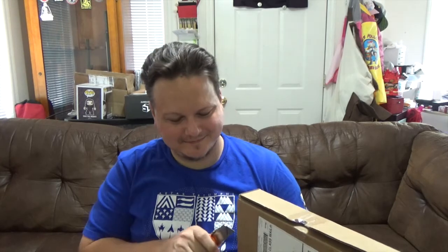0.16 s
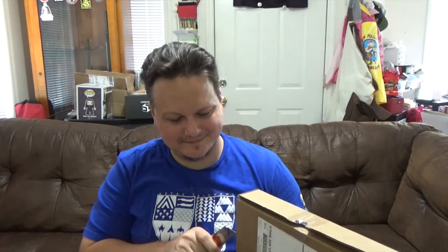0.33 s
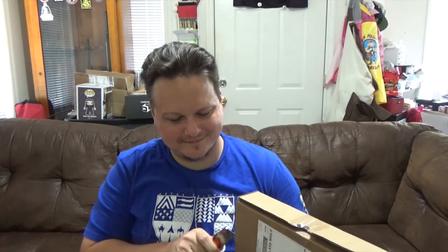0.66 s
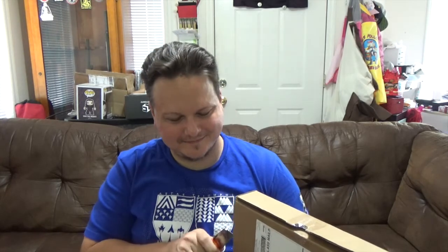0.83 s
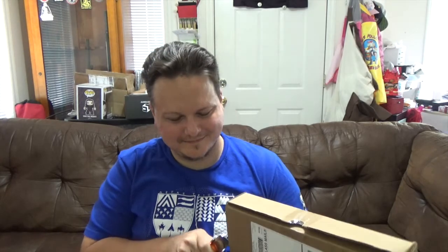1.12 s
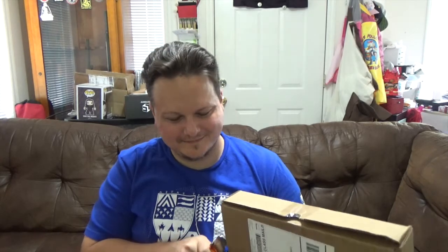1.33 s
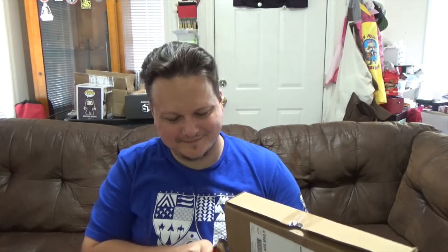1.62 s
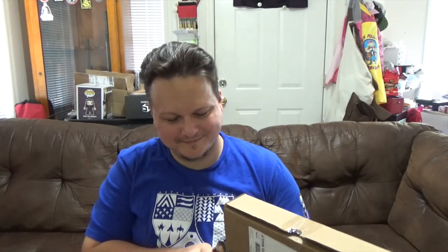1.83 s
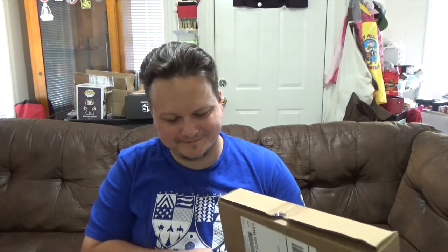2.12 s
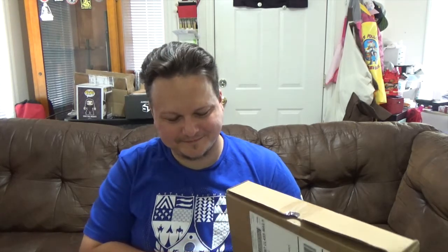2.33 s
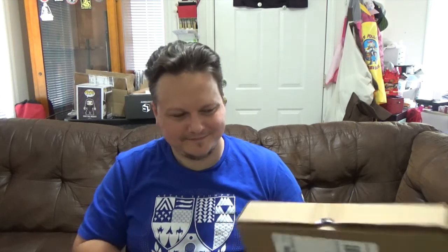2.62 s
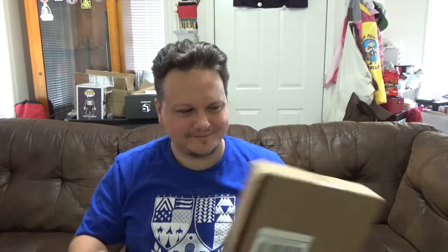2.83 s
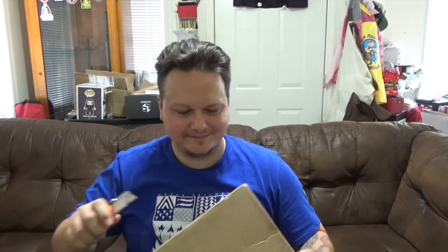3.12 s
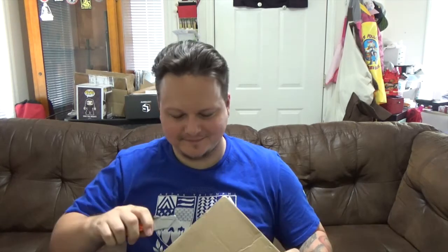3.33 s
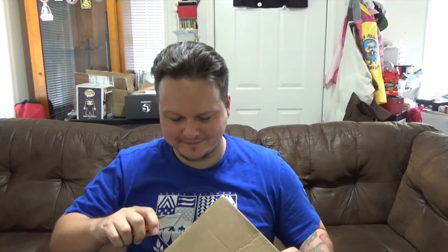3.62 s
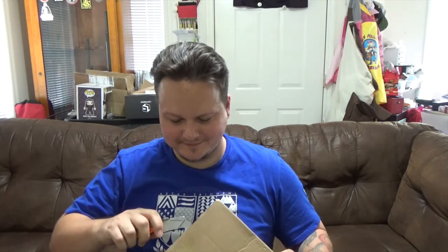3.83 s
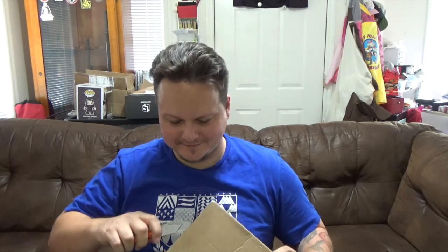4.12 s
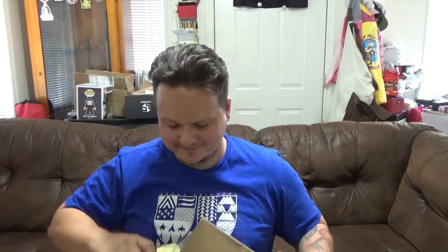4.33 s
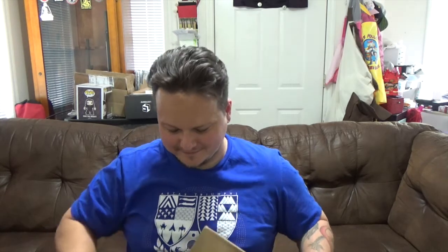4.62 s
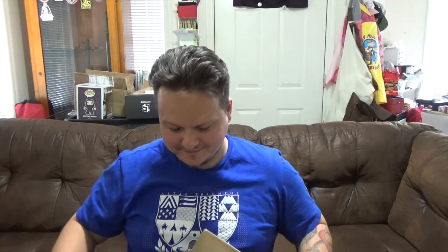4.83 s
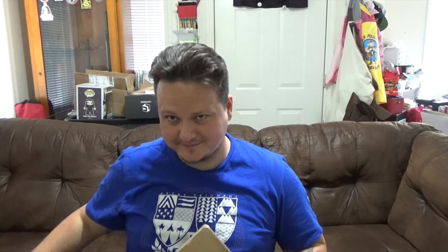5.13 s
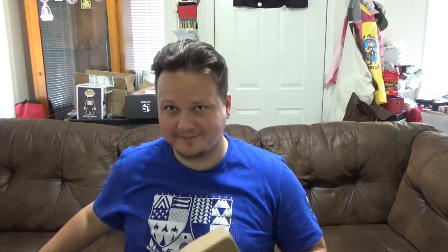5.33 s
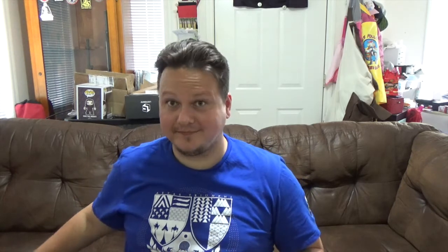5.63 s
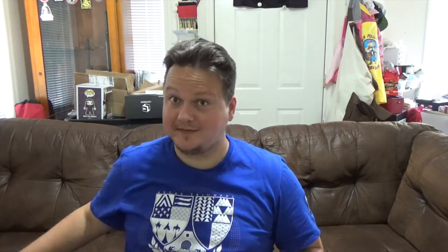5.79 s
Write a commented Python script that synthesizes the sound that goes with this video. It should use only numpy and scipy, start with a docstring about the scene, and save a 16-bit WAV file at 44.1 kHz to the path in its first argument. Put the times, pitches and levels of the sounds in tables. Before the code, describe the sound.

A quiet furnished room, heard through a nearby camera microphone, with soft low motor hum, airy noise and a very faint, rapidly pulsing high whine. For the first half second there is only this background. From 0.6 to 1.8 s come tiny ticks and soft scuffs on card, with a barely audible wavering squeak near 1.1 s. At 1.93 s a sharp crack bursts through tape, and at 2.2 s a louder one with a hollow knock and short bright, gritty rip, fading by 2.4 s. From 2.5 to 3.1 s fingers tap and slide as the box turns, changing its tone. A sparse pause follows, with a tick at 3.5 s. Small scrapes and snaps begin around 4.0 s, leading to a strong, boxy thump at 4.57 s and a juddering rasp until about 4.8 s. Then near quiet, with light rustles and ticks at 5.6 to 5.8 s, the whine slightly lower.

```python
"""Opening a taped cardboard box

A small blade opens the tape seals of a flat cardboard box in a furnished living room, close to a camera
microphone. The point pops through the tape (sharp cracks), the edge rasps along the seam (bursts of tiny random
fractures), and the hollow box thumps as the slit lets go (decaying tones). Between cuts, fingers tap and slide
on the card. The box is turned once, which changes its tone. The room hums (filtered noise, low tones), and a
faint electronic whine chirps thirty times a second."""
import sys
import numpy as np
from scipy import signal
from scipy.fft import rfft, irfft
from scipy.io import wavfile
from scipy.ndimage import uniform_filter1d

SR = 44100
rng = np.random.default_rng(int(sys.argv[2]) if len(sys.argv) > 2 else 0)


def materialize(psi):
    """Save the field psi as 16-bit PCM at rate SR to the path in sys.argv[1].

    A 1-D psi becomes a single channel; in a 2-D psi each row is a channel.
    """
    bounded = np.clip(np.atleast_2d(psi).T, -1, 1)
    quanta = np.round(bounded * 32767).astype(np.int16)
    wavfile.write(sys.argv[1], SR, quanta)


N = 262777
T = np.arange(N) / SR  # time in seconds
TURN_S = 2.9  # moment at which the box is swung round to its second seal


def undb(db):
    """Decibels to gain."""
    return 10 ** (np.asarray(db) / 20)


def unit(x):
    """Scale to rms 1."""
    return x / np.sqrt(np.mean(x ** 2) + 1e-20)


def energy(x):
    """Scale a response to energy 1."""
    return x / np.sqrt(np.sum(x ** 2) + 1e-20)


def peak(x, db):
    """Scale to a peak level in dB."""
    return x * undb(db) / np.max(np.abs(x))


def butter(x, hz, kind):
    """Second-order low-pass or high-pass filter."""
    return signal.sosfilt(signal.butter(2, hz, kind, fs=SR, output="sos"), x)


def through(x, response):
    """Pass a sound through a response, keeping its length."""
    return signal.fftconvolve(x, response)[:len(x)]


def add(out, s, x):
    """Mix a short sound in at time s."""
    i = int(s * SR)
    out[i:i + len(x)] += x[:N - i]


def gains(points, size):
    """Gain at each FFT bin, drawn between (Hz, dB) points on a log pitch scale."""
    hz, db = np.transpose(points)
    bin_hz = np.arange(size // 2 + 1) * SR / size
    return undb(np.interp(np.log(bin_hz + 1), np.log(hz), db))


def colour(points, size=2048):
    """Short response with the given spectrum that starts at once (minimum phase, by folding the cepstrum)."""
    cepstrum = irfft(np.log(gains(points, size)))
    cepstrum[1:size // 2] *= 2
    cepstrum[size // 2 + 1:] = 0
    return energy(irfft(np.exp(rfft(cepstrum))))


def ring(hz, t60, size=12000):
    """One damped tone that fades by 60 dB in t60 seconds."""
    return np.sin(2 * np.pi * hz * T[:size]) * np.exp(-np.log(1000) * T[:size] / t60)


def walk(rate):
    """Smooth random wander with rms 1, taking about rate steps per second."""
    step = max(int(SR / rate), 1)
    stairs = np.repeat(rng.standard_normal(N // step + 1), step)
    return unit(uniform_filter1d(stairs, step)[:N])


def grains(rate, spread_db):
    """Tiny fractures at random moments, rate per second, of random sign and unequal size."""
    happens = rng.random(N) < rate / SR
    sign = np.sign(rng.standard_normal(N))
    scatter = np.clip(rng.standard_normal(N), -2, 2)
    return unit(happens * sign * undb(spread_db * scatter))


# How much the left and right ports differ for sound from all around.
# Each row: pitch in Hz, side level against the middle in dB.
PORT_DIFFERENCE = [(60, -36.5), (110, -30.5), (200, -15.5), (380, -10), (700, -7.5), (1290, -2),
                   (2380, -3.5), (4400, -5.5), (8120, -11), (15000, -38.5)]


def diffuse(mid, side):
    """Left and right of a sound from all around; the close ports agree in the bass."""
    side = irfft(rfft(side) * gains(PORT_DIFFERENCE, N), N)
    return np.array([mid + side, mid - side])


# Spectrum of the room air. Each row: pitch in Hz, relative level in dB.
AIR_SPECTRUM = [(12, -53.5), (20, -9.5), (53, -11.5), (146, -1), (172, -6.5), (270, -11.5), (377, -8),
                (410, -11.5), (446, -14.5), (825, -11), (1290, -19), (2670, -21.5), (4300, -26),
                (9950, -28.5), (16000, -35)]
AIR_DB = -64  # before the swell below
# Slow changes of air and hum together. Each row: time in seconds, added level in dB.
ROOM_SWELL = [(0, 4), (.5, 0.5), (1.5, 2), (2.6, 4), (3.5, 4), (4.9, 5), (5.96, 5)]
# Household motors. Each row: pitch in Hz, level in dB before the waver and the swell.
MOTOR_HUM = [(81, -82.5), (104, -80), (120, -87.5), (146, -72.5), (665, -83.5)]


def background(hum_waver_db=2.5):
    """Room air is shaped noise; household motors hum as low tones that waver in level and phase."""
    air = []
    for noise in rng.standard_normal((2, N)):
        air.append(undb(AIR_DB) * unit(irfft(rfft(noise) * gains(AIR_SPECTRUM, N), N)))
    hum = np.zeros(N)
    for hz, db in MOTOR_HUM:
        tone = unit(np.sin(2 * np.pi * hz * T + 1.16 * walk(9)))
        hum += undb(db + hum_waver_db * walk(8.4)) * tone
    return (diffuse(*air) + hum) * undb(np.interp(T, *np.transpose(ROOM_SWELL)))


# Lower tone of the electronic whine.
# Each row: time in seconds, pitch in Hz before a small waver, level in dB before it is made uneven.
WHINE_PATH = [(0, 3040, -71.5), (1.2, 3053, -72.5), (1.7, 3107, -70.5), (3.8, 3110, -70), (4.5, 3104, -69),
              (5.0, 2660, -71.5), (5.96, 2670, -70.5)]


def whine(upper_hz=3730, upper_db=-6, waver=0.0062, uneven_db=2.5):
    """Two thin electronic tones chirp together thirty times a second; upper_hz is the upper one's start."""
    s, hz, db = np.transpose(WHINE_PATH)
    wavering_hz = np.interp(T, s, hz) * (1 + waver * walk(90))
    phase = 2 * np.pi * np.cumsum(wavering_hz) / SR
    pulse = np.cos(np.pi * 29.97 * (T + .004)) ** 4
    level = undb(np.interp(T, s, db) + uneven_db * walk(18))
    tones = np.sin(phase) + undb(upper_db) * np.sin(upper_hz / hz[0] * phase)
    return level * pulse * tones


ROOM_T60_S, ROOM_DB, EARLY_DB = 0.26, -16, -16  # bass fading time, tail and early levels


def room(x, early_s=0.011, treble_t60_s=0.27, split_hz=2500, size=20000):
    """Quick reflections from the body and sofa, then the short tail of a soft room, as fading noise."""
    t = T[:size]
    near, far = rng.standard_normal((2, size))
    early = energy(near * np.exp(-t / early_s) * (t > .001))
    low = butter(far, split_hz, "low")
    low_tail = low * np.exp(-np.log(1000) * t / ROOM_T60_S)
    high_tail = (far - low) * np.exp(-np.log(1000) * t / treble_t60_s)
    tail = energy((low_tail + high_tail) * (t > .008))
    return through(x, undb(EARLY_DB) * early + undb(ROOM_DB) * tail)


# A thin, faint squeak. Each row: time in seconds, pitch in Hz, level in dB.
SQUEAK_PATH = [(1.02, 3690, -83), (1.06, 3820, -70), (1.11, 3660, -79), (1.17, 3650, -76),
               (1.21, 3800, -69), (1.25, 3740, -72), (1.29, 3530, -85)]


def whistle():
    """A thin squeak, one gliding tone, wavers twice up and down."""
    s, hz, db = np.transpose(SQUEAK_PATH)
    phase = 2 * np.pi * np.cumsum(np.interp(T, s, hz)) / SR
    return np.sin(phase) * undb(np.interp(T, s, db, left=-np.inf, right=-np.inf))


def patch(hz, t60):
    """A small ringing area; well below its own pitch it radiates little, so the bass is cut."""
    return peak(butter(ring(hz, t60), min(0.64 * hz, SR / 3), "high"), 0)


# Ringing of the box walls and the air inside; turning the box changes which tones the hands reach.
# Each row: pitch in Hz, level in dB before the turn, level in dB after it, time to fade by 60 dB in seconds.
BOX_MODES = [(145.5, -18.5, -12, 0.55), (267, 2.5, 4, 0.093), (291, -8, 0.5, 0.32), (387, -3, -2.5, 0.21),
             (423, -14, -27, 0.061), (471, 0, 8, 0.027), (535, -6, -25, 0.25), (634.5, 10, 5, 0.057),
             (679, 4, -5.5, 0.12), (738, -29.5, -6, 0.053), (816, -4, 3, 0.04), (863, -2, 1, 0.15),
             (950, -12.5, -3, 0.051), (990, 3.5, -13, .05), (1160, -21, -3, 0.057), (1217, 2, 4.5, 0.074),
             (1285, -20, -31, 0.054), (1505, -9, -4, 0.093), (1670, 5, -44, 0.041), (2550, -0.5, -25, .04)]
# Dull flexing of the card. Each row: pitch in Hz, relative level in dB.
CARD_FLEX = [(30, -67), (100, -33), (200, -30.5), (330, -4), (480, 0), (680, 2.5), (850, 0.5), (1100, -4),
             (1700, -7.5), (3000, -41.5), (8000, -40)]


def box_response(flex_db):
    """Ringing panels plus the dead, broad flexing of corrugated card, before and after the turn."""
    hz, before, after, t60 = np.transpose(BOX_MODES)
    modes = np.array([(-1) ** k * ring(hz[k], t60[k]) for k in range(len(hz))])
    responses = []
    for db in (before, after):
        pose = energy(undb(db) @ modes)
        add(pose, 0, undb(flex_db) * colour(CARD_FLEX))
        responses.append(energy(butter(pose, 120, "high")))
    return responses


# Hiss of parting tape. Each row: pitch in Hz, level in dB before the turn, level in dB after it.
TAPE_HISS = [(313, -37, -48), (930, 1, 1.5), (1597, 0.5, 2.5), (2380, 0.5, 6), (3200, -2, -1.5),
             (4200, -2, 3.5), (5640, -2.5, 0.5), (7200, -4.5, 2.5), (8240, 4, 5.5), (10300, 0.5, 5),
             (12200, -5.5, -1), (14700, -13, -7), (16020, -16.5, -19)]


def rasp_response():
    """Colour of the tape's hiss before and after the turn."""
    hz, before, after = np.transpose(TAPE_HISS)
    return [colour(np.transpose([hz, db])) for db in (before, after)]


def excite(force, responses):
    """Drive the box in whichever way it is held at each moment."""
    before = through(force * (T < TURN_S), responses[0])
    after = through(force * (T >= TURN_S), responses[1])
    return before + after


def gestures(rows, sag, release, axis):
    """Gain of hand movements: each swells, eases (sag, dB per second) and dies away; axis picks the level."""
    gain = np.zeros(N)
    for row in rows:
        s, hold, attack = row[:3]
        since = T - s
        rise = 20 * np.minimum(since, 0) / attack
        ease = sag * np.clip(since, 0, hold)
        fall = 20 * np.maximum(since - hold, 0) / release
        gain = np.maximum(gain, undb(row[axis] + np.maximum(rise - ease - fall, -200)))
    return gain


# Light touches of fingers, tape and blade on the card.
# Each row: start in seconds, crack peak in dB, box peak in dB before box_db is added, click peak in dB.
CARD_TICKS = [(.6135, -44.5, -58, -59), (0.805, -45, -57, -50.5), (0.8657, -49, -55, -58),
              (1.018, -43, -48, -46), (1.4176, -32.5, -44, -53), (1.604, -43, -60, -52),
              (1.663, -44, -72, -51.5), (1.7828, -37, -53, -47), (2.1025, -37, -43, -44),
              (2.462, -37, -60, -39), (2.674, -42, -58, -46), (2.713, -40, -46, -39.5),
              (2.748, -31.5, -56, -44), (2.7681, -30.5, -48, -38), (2.799, -48, -48, -62),
              (2.876, -32, -47.5, -41.5), (2.9444, -47, -51, -45), (3.037, -38, -59, -41.5),
              (3.0872, -37, -43, -42), (3.236, -44, -64, -49.5), (3.4694, -32, -44, -37),
              (4.1178, -37.5, -57, -53), (4.1373, -42, -65, -54), (4.1696, -24.5, -49, -49),
              (4.2417, -43, -45.5, -62), (4.375, -40, -56, -55), (4.4742, -24, -38, -35),
              (4.693, -23.5, -31, -37), (5.5721, -35.5, -53, -38), (5.5955, -37, -53, -62),
              (5.7726, -40, -50, -45)]
# Crack of a light contact. Each row: pitch in Hz, relative level in dB.
CONTACT_CRACK = [(100, -47), (800, -17.5), (2000, -0.5), (4000, 0), (6800, -3), (9500, 2.5), (12000, -10.5),
                 (16000, -11.5)]
CRUMBLE_S = 0.0032  # time in which the trail of crushed fibres fades (to 37 percent)


def ticks(box_db=2, crumble=0.19, click_hz=1700, click_t60=0.0015, size=12000):
    """A contact and a quick trail of crushed fibres: a crack on top, a click and a knock below."""
    out, crack, boxes = np.zeros(N), colour(CONTACT_CRACK), box_response(flex_db=18)
    click = patch(click_hz, click_t60)
    for s, top_db, low_db, mid_db in CARD_TICKS:
        force = crumble * rng.standard_normal(size) * np.exp(-T[:size] / CRUMBLE_S)
        force[0] = 1
        box = boxes[int(s > TURN_S)]
        add(out, s, peak(through(force, crack), top_db))
        add(out, s, peak(through(force, box), low_db + box_db))
        add(out, s, peak(through(force, click), mid_db))
    return out


# Hands sliding on the card. Each row: start of the hold in seconds, hold in seconds, attack in seconds
# (rise of 20 dB, before the start), hiss level in dB, drive into the box in dB before body_db is added.
HAND_SLIDES = [(.865, .006, .06, -63, -59), (.958, .01, 0.04, -68, -57), (1.02, .006, .03, -70, -58),
               (1.413, 0.0036, 0.013, -53.5, -49.5), (1.55, .005, 0.046, -68, -68),
               (2.48, 0.057, .03, -66, -64), (2.622, .003, .01, -54, -59), (2.69, 0.089, 0.068, -59, -55),
               (2.825, 0.13, .04, -60.5, -55.5), (3.04, .055, .02, -63, -49), (3.11, .015, .03, -63, -55),
               (3.86, .03, .07, -67, -64), (4.043, .004, .035, -54.5, -49.5), (4.125, 0.014, .02, -59, -57),
               (4.247, .02, .015, -68, -54), (4.328, 0.0074, 0.092, -59, -52.5),
               (5.56, .17, 0.094, -69.5, -63), (5.785, 0.08, 0.13, -62, -57)]
SLIDE_SAG_DB_PER_S, SLIDE_RELEASE_S = 7, 0.03  # release is the time to fall 20 dB


def sliding(body_db=-1, grip_db=3.0):
    """Skin drags unevenly over the paper face: random grains hiss and drive the walls."""
    drag = unit(grains(rate=7000, spread_db=4.0) * undb(grip_db * walk(76)))
    rubbing = gestures(HAND_SLIDES, SLIDE_SAG_DB_PER_S, SLIDE_RELEASE_S, axis=3)
    pressing = gestures(HAND_SLIDES, SLIDE_SAG_DB_PER_S, SLIDE_RELEASE_S, axis=4)
    hiss = excite(drag * rubbing, rasp_response())
    return hiss + undb(body_db) * excite(drag * pressing, box_response(flex_db=11.5))


def crinkles(per_s=30, spread_db=3, crinkle_db=-12):
    """Faint stray cracks of the paper face, following the strength of the sliding hand."""
    rubbing = gestures(HAND_SLIDES, SLIDE_SAG_DB_PER_S, SLIDE_RELEASE_S, axis=3)
    force = grains(per_s, spread_db) * rubbing
    return undb(crinkle_db) * through(force, colour(CONTACT_CRACK))


# Short bands of hiss, each around its own pitch, many of them brightening a blade stroke.
# Each row: start in seconds, length in seconds, level in dB, pitch in Hz.
HISS_BANDS = [(1.399, 0.046, -63, 1740), (1.548, .019, -62.5, 1750), (2.108, 0.066, -54, 8850),
              (2.23, 0.064, -38, 13000), (3.83, .062, -63.5, 1560), (3.897, 0.02, -63, 1950),
              (3.999, 0.0066, -56, 1650), (4.011, .041, -56.5, 1640), (4.31, 0.033, -61, 10500),
              (4.358, 0.019, -47.5, 10100), (4.483, 0.074, -51, 9300), (4.62, 0.054, -42.5, 5300),
              (4.688, 0.066, -47, 5670), (4.69, 0.084, -44.5, 10200)]
BAND_CYCLES = 20  # cycles each band rings while fading 60 dB, so low bands last longer


def hiss_bands():
    """Random grains swell and fade through a brief ring; higher bands ring more briefly."""
    out, hiss = np.zeros(N), grains(rate=9000, spread_db=3)
    for s, length, db, hz in HISS_BANDS:
        swell = np.sin(np.pi * np.clip((T - s) / length, 0, 1))
        band = energy(patch(hz, BAND_CYCLES / hz))
        out += undb(db) * through(hiss * swell, band)
    return out


def spring_back(hz, cycles, box, box_db):
    """A freed patch of card rings briefly at its own pitch and shakes the whole box."""
    return patch(hz, cycles / hz) + peak(box, box_db)


# A patch of wall springs back. Each row: start in seconds, patch peak in dB, patch pitch in Hz,
# cycles it rings while fading 60 dB, whole box against the patch in dB.
WALL_THUMPS = [(.868, -48.5, 597, 47, -5), (1.419, -50.5, 540, 21, -10), (1.932, -24.5, 690, 25, -8.5),
               (1.9858, -21.5, 474, 14, -9), (1.989, -28.5, 305, 9.3, -12), (2.1997, -14, 980, 12, -11),
               (2.2006, -15.5, 530, 12, -18), (2.2052, -21, 398, 29, -0.5), (2.266, -34.5, 271, 21, -6),
               (2.6216, -37.5, 638, 17, -7.5), (2.8202, -42.5, 700, 9, -3), (3.036, -41, 565, 18, -0.5),
               (3.064, -35, 776, 5.1, -11.5), (3.469, -47, 169, 10, -22), (4.243, -50, 1004, 18, -4),
               (4.361, -43.5, 714, 19, 2), (4.5638, -6.5, 441, 10.3, -4), (4.5643, -14.5, 288, 31, -22),
               (4.5688, -29.5, 1125, 51, 9.5), (4.573, -14.5, 727, 28, -6.5), (4.5841, -18.5, 460, 14, -5),
               (4.6279, -26, 271, 35, -6), (4.6284, -18.5, 812, 49, -6), (4.697, -36, 173, 5, -5)]
# The blade jumps from flute to flute (the ridges inside the card). Each row: start in seconds,
# length in seconds, peak in dB and pitch of the freed patch in Hz, both before random scatter.
FLUTE_JUDDERS = [(2.222, .05, -34, 440), (4.622, .046, -19.5, 720)]
FLUTES_PER_S, CARD_CYCLES, FLUTE_BOX_DB = 160, 24.4, -8
FLUTE_SCATTER, FLUTE_SCATTER_DB, FLUTE_PITCH_SPREAD = .2, 1.5, 0.087  # timing (in flutes), level, log pitch


def thumps():
    """Single thumps as a wall lets go, and quick uneven runs of them as the blade crosses the flutes."""
    out, boxes = np.zeros(N), box_response(flex_db=-7.0)
    for s, db, hz, cycles, box_db in WALL_THUMPS:
        add(out, s, undb(db) * spring_back(hz, cycles, boxes[int(s > TURN_S)], box_db))
    for s, length, db, hz in FLUTE_JUDDERS:
        box = boxes[int(s > TURN_S)]
        for k in range(int(np.ceil(length * FLUTES_PER_S))):
            late, loud, high = rng.standard_normal(3)
            jump = spring_back(hz * np.exp(FLUTE_PITCH_SPREAD * high), CARD_CYCLES, box, FLUTE_BOX_DB)
            start = s + (k + FLUTE_SCATTER * late) / FLUTES_PER_S
            add(out, start, undb(db + FLUTE_SCATTER_DB * loud) * jump)
    return out


# The point bursts through the tape.
# Each row: start in seconds, crack peak in dB, ring of the tape against it in dB before tape_db is added.
TAPE_POPS = [(1.9316, -2, -39), (1.9339, -12.5, -28.5), (2.1996, 3.5, -9.5), (4.569, -10.5, 9)]
# Crack of bursting tape. Each row: pitch in Hz, relative level in dB.
BURST_CRACK = [(60, -50), (400, -51), (1500, -8), (3000, -11), (6000, -7), (8200, -3.5), (9900, 1),
               (12000, -8), (16000, -20)]


def pops(tape_hz=4300, tape_t60=0.0018, tape_db=-12, splinter=0.079, splinter_s=0.0009, size=2048):
    """Each puncture is one sharp crack, a spray of splintering fibres and a brief ring of the tape."""
    out, crack = np.zeros(N), colour(BURST_CRACK)
    for s, db, ring_db in TAPE_POPS:
        force = splinter * rng.standard_normal(size) * np.exp(-T[:size] / splinter_s)
        force[0] = 1
        add(out, s, peak(through(force, crack), db))
        add(out, s, undb(db + ring_db + tape_db) * patch(tape_hz, tape_t60))
    return out


# Pushes of the blade. Each row: start of the hold in seconds, hold in seconds, attack in seconds
# (rise of 20 dB, before the start), rasp of parting fibres in dB, drive into the box in dB before body_db is added.
BLADE_STROKES = [(1.932, 0.05, 0.0045, -37, -36), (2.126, .002, 0.028, -47.5, -44.5),
                 (2.17, .027, 0.068, -49.5, -47.5), (2.203, 0.021, 0.0065, -36.5, -30),
                 (2.248, 0.036, 0.071, -31.5, -33), (2.458, 0.0036, 0.11, -47.5, -50.5),
                 (4.171, 0.0046, 0.0028, -43, -44.5), (4.363, 0.0093, 0.006, -53.5, -44),
                 (4.476, 0.012, 0.0037, -47, -42), (4.569, 0.012, .05, -32, -32),
                 (4.628, .04, 0.073, -34.5, -29.5), (4.7, 0.052, .03, -44.5, -45)]
# A push eases while held, then dies away, the rasp before the box (releases are times to fall 20 dB).
STROKE_SAG_DB_PER_S, RASP_RELEASE_S, BOX_RELEASE_S = 26, 0.037, 0.054


def cutting(catch_db=2.5, catch_rate=240, shake_db=2.0, body_db=-2):
    """The edge catches and slips; parting tape hisses while the card under it shakes the box."""
    catches = walk(catch_rate)
    tape = unit(grains(rate=12000, spread_db=4.5) * undb(catch_db * catches))
    card = unit(grains(rate=6500, spread_db=0.5) * undb(shake_db * catches))
    parting = gestures(BLADE_STROKES, STROKE_SAG_DB_PER_S, RASP_RELEASE_S, axis=3)
    pushing = gestures(BLADE_STROKES, STROKE_SAG_DB_PER_S, BOX_RELEASE_S, axis=4)
    rasp = excite(tape * parting, rasp_response())
    return rasp + undb(body_db) * excite(card * pushing, box_response(flex_db=0.5))


def scene(side_db=1):
    """The box is straight ahead; only its reflections and the room noise have width."""
    quiet = whistle() + ticks() + sliding() + crinkles() + hiss_bands()
    loud = thumps() + pops() + cutting()
    direct = quiet + loud
    reflections = diffuse(room(direct), undb(side_db) * room(direct))
    return background() + whine() + reflections + direct


TOP_HZ = 16200


def record(dry):
    """The camera clips at full scale, then a steep low-pass filter cuts the top."""
    low_pass = signal.ellip(10, .2, 85, TOP_HZ, fs=SR, output="sos")
    return signal.sosfilt(low_pass, np.clip(dry, -1, 1))


dry = scene()
out = record(dry)
materialize(out)
```